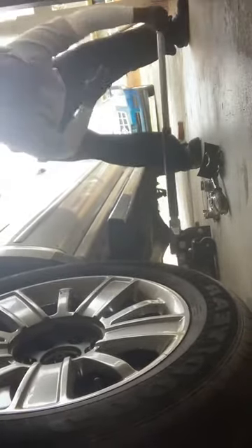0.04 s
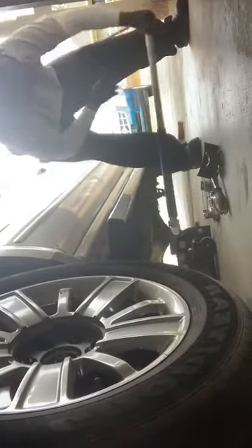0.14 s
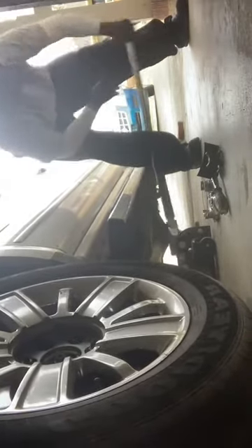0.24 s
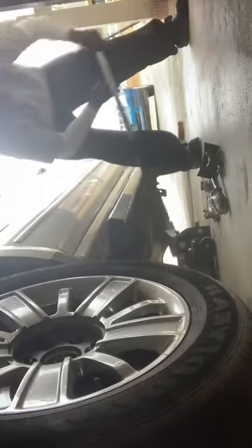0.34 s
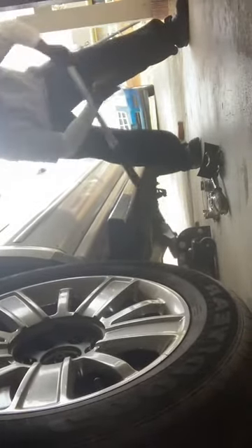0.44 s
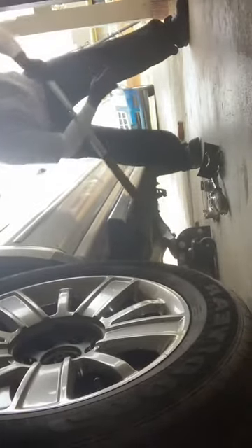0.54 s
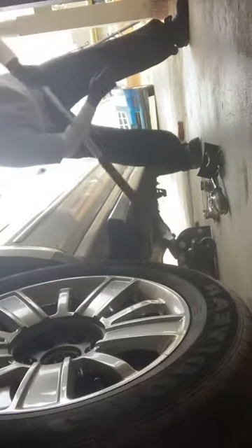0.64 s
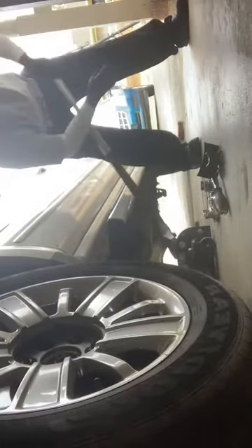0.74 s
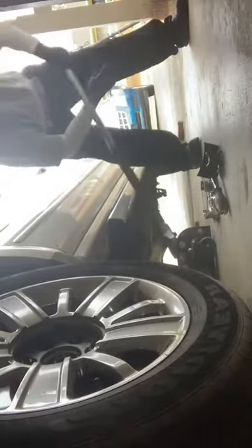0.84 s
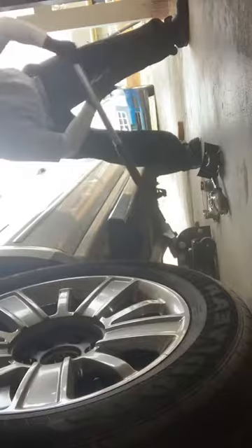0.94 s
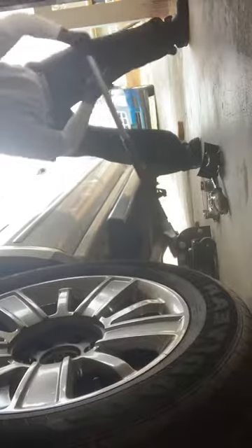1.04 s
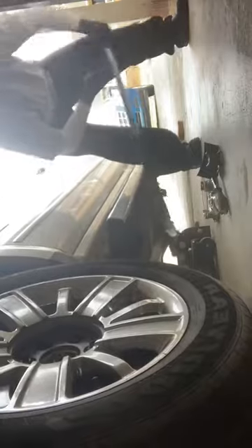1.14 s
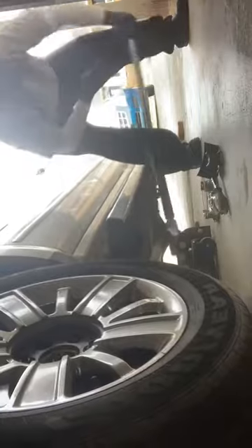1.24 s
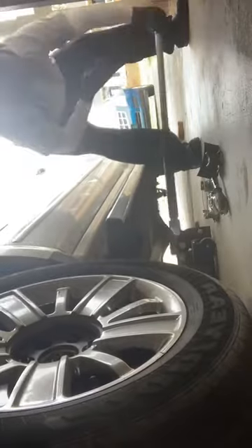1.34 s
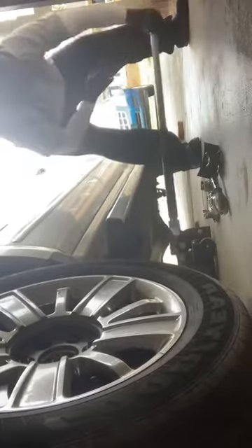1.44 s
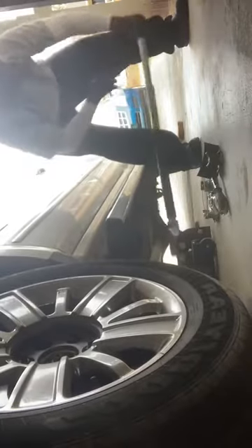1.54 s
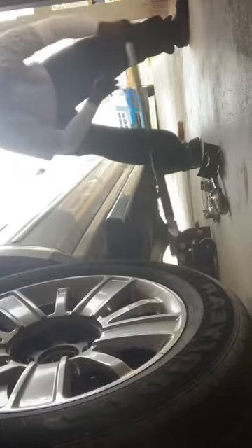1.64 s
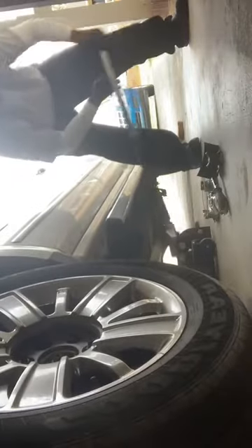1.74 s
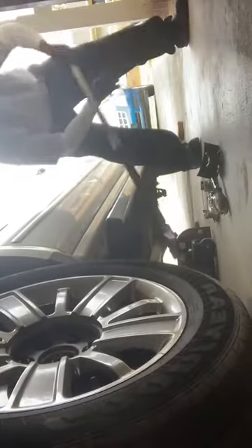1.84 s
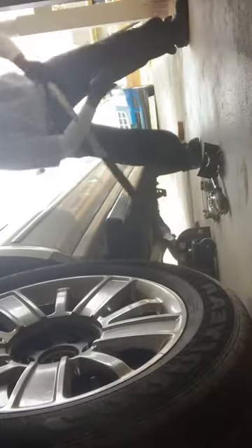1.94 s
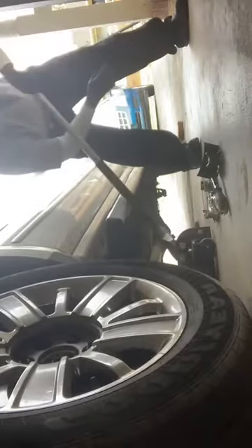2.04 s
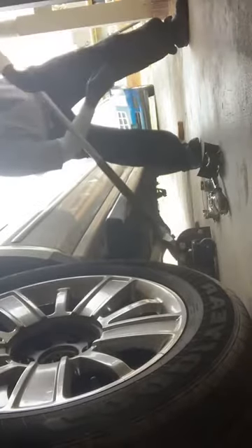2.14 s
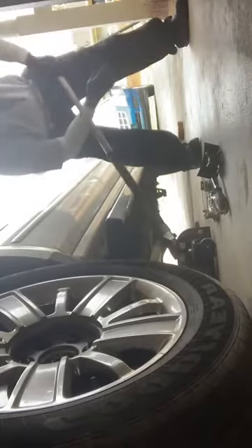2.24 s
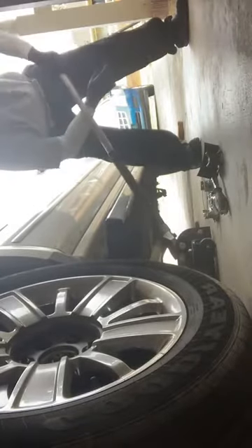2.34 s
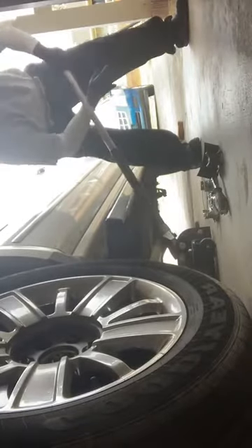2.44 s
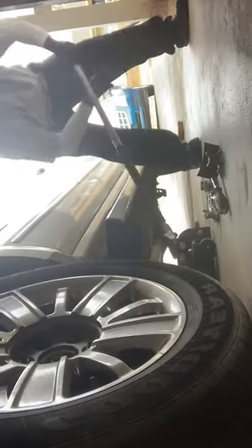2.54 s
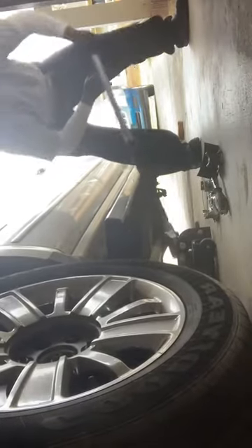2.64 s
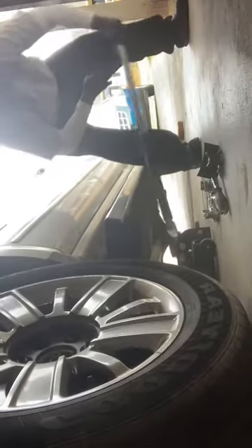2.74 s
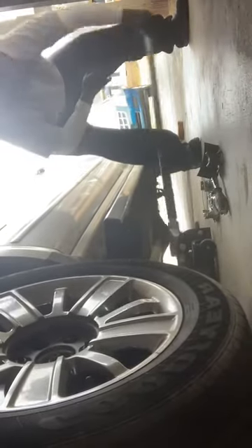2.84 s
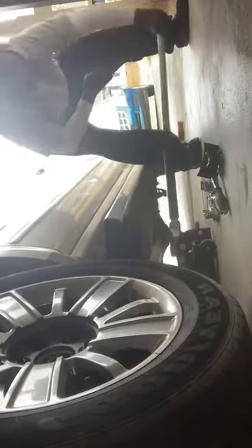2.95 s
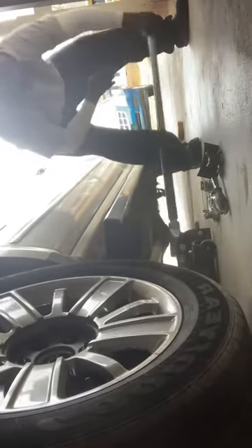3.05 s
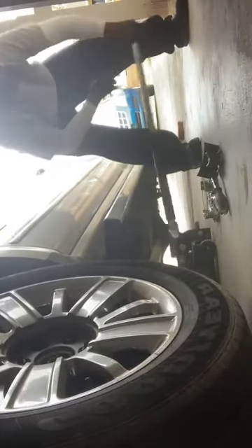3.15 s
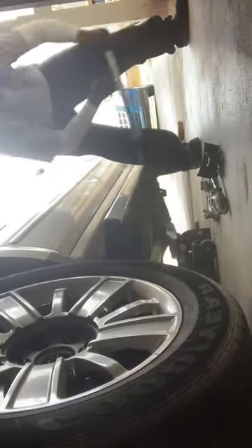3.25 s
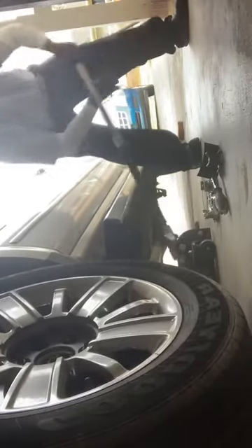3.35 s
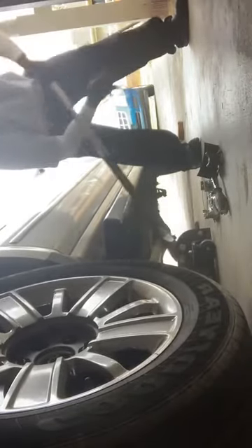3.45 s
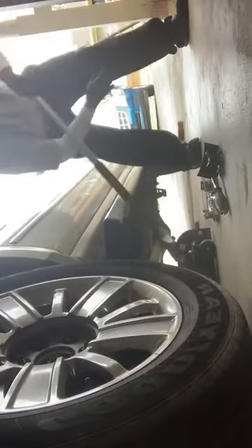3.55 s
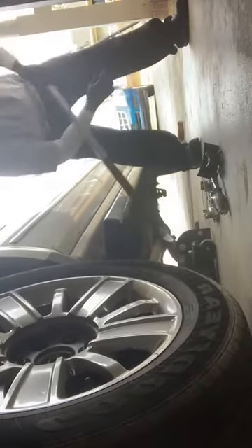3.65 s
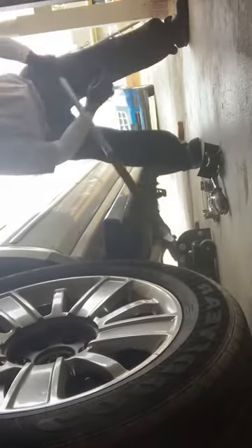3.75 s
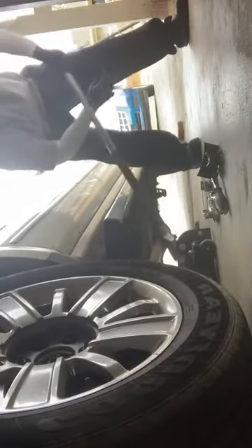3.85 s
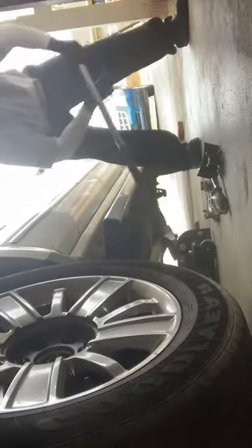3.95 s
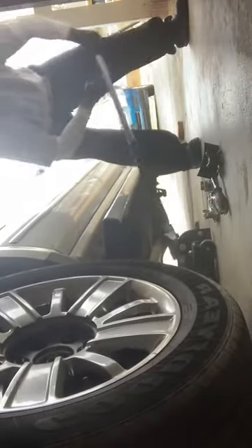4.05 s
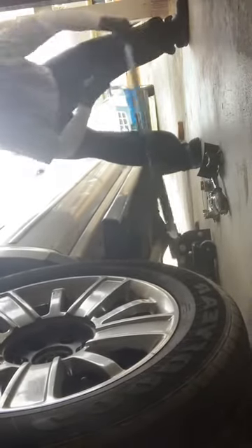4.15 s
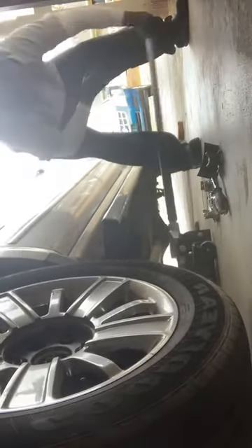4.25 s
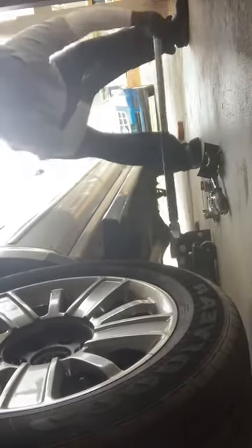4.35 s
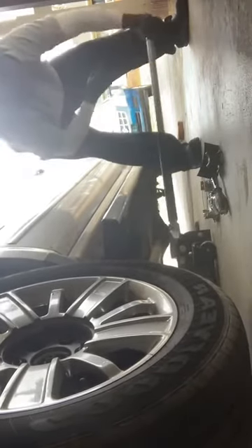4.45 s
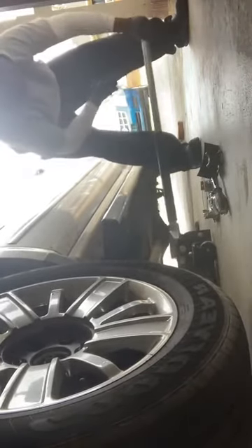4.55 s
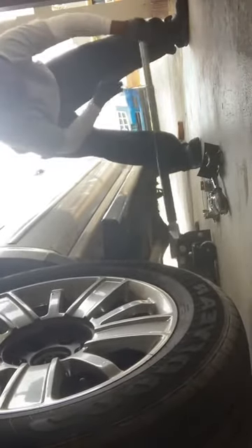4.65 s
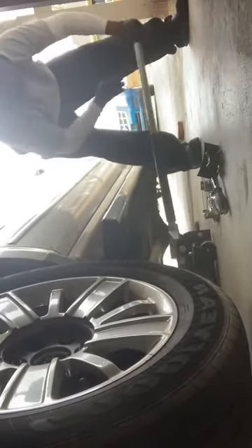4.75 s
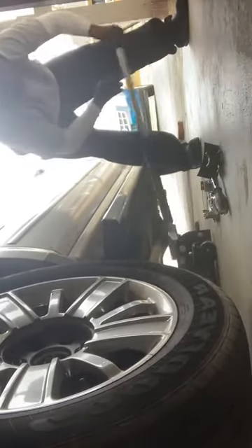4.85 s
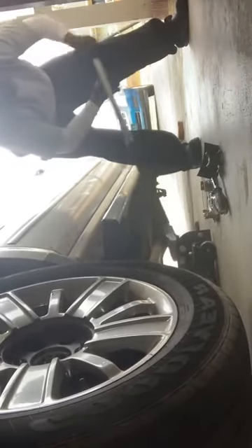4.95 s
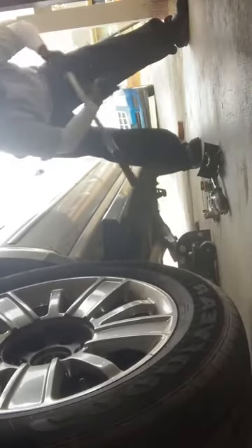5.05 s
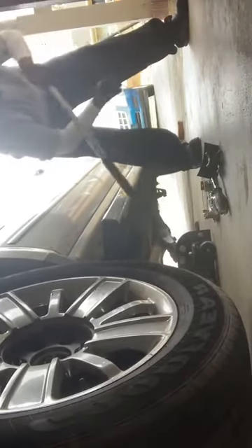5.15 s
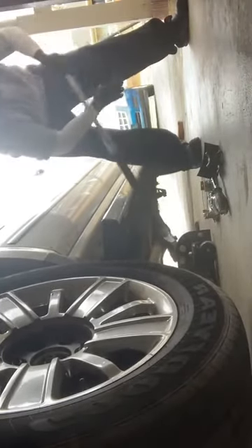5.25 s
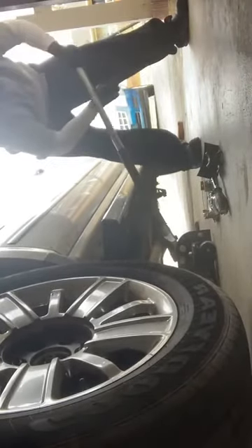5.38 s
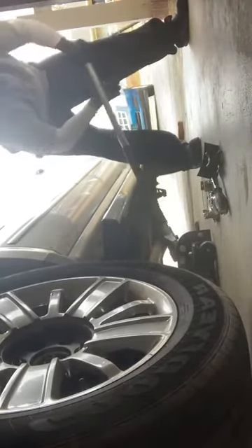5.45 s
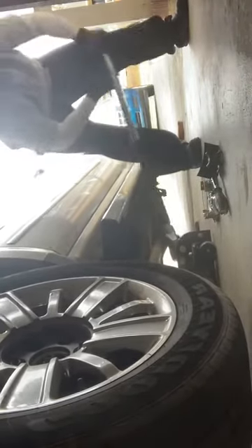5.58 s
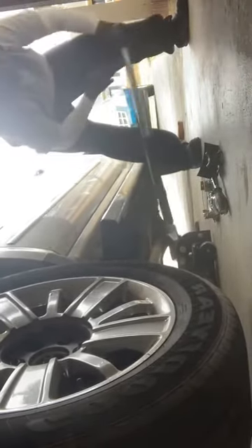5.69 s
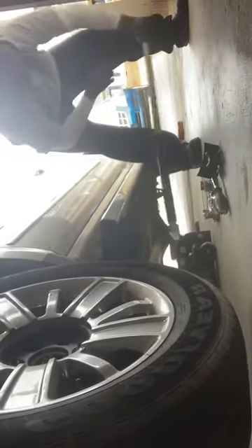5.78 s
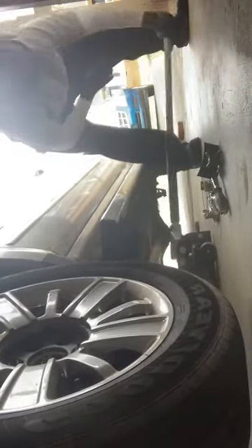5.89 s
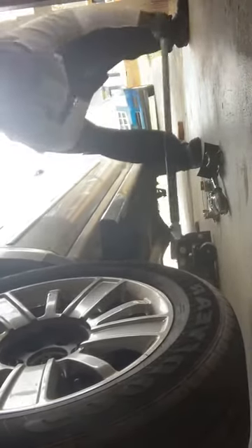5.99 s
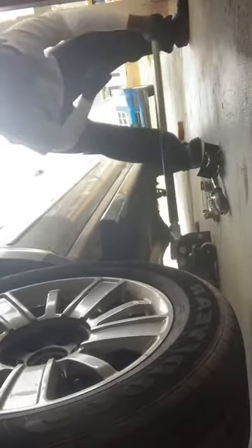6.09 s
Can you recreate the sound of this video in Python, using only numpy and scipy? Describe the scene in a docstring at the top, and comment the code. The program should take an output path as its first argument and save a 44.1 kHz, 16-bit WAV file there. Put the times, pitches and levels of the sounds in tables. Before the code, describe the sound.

A steel floor jack is pumped on concrete, four loud metallic clanks about a second and a half apart, with squeaks, rubbing and low truck booms.

```python
"""On concrete in a yard, a steel floor jack is pumped beside a truck, heard by a microphone close by.
Its handle and linkage knock and rattle: noise rings steel modes, and showers of tiny contacts make shudders.
Pivots squeak and parts creak by stick-slip, made as noise in narrow resonances; sliding parts rub and hiss.
The truck body booms after jolts, as noise in a drifting low resonance. The yard is a steady, patchy hum."""
import sys
import numpy as np
from scipy import signal
from scipy.fft import rfft, irfft
from scipy.io import wavfile
from scipy.ndimage import uniform_filter1d

SR = 44100
rng = np.random.default_rng(int(sys.argv[2]) if len(sys.argv) > 2 else 0)


def materialize(psi):
    """Save the field psi as 16-bit PCM at rate SR to the path in sys.argv[1].

    A 1-D psi becomes a single channel; in a 2-D psi each row is a channel.
    """
    bounded = np.clip(np.atleast_2d(psi).T, -1, 1)
    quanta = np.round(bounded * 32767).astype(np.int16)
    wavfile.write(sys.argv[1], SR, quanta)


N = 269874  # samples in the scene
SHORT_N = N // 8  # samples of chance drawn for one short sound

# Knocks of handle and linkage: t/s, clink level/dB, clank level/dB, frame thud level/dB, ring length (factor)
KNOCKS = [(0.0094, -42, -64, -46.5, 0.83), (0.3265, -45, -34.5, -37, 0.61), (0.7976, -48.5, -39, -35, 0.73),
          (0.8316, -43, -38.5, -34.5, 0.33), (0.9198, -34, -38, -38.5, 0.74),
          (1.038, -12.5, -20, -12.5, 0.71), (1.3745, -49, -54, -51, 0.77), (1.725, -42.5, -33.5, -39, 0.87),
          (2.1349, -39.5, -39.5, -35.5, 0.53), (2.2758, -36.5, -34, -38.5, 0.62),
          (2.4035, -41, -41.5, -46.5, 1), (2.5854, -11, -18, -10, 0.67), (3.002, -40, -62, -49, 0.66),
          (3.153, -52, -61, -48, 0.71), (3.2498, -41, -34, -35.5, 0.7), (3.6126, -26, -39, -45, 0.29),
          (3.6222, -22.5, -24.5, -35, 0.67), (3.7133, -28.5, -30.5, -64, 0.97),
          (3.7309, -24, -32, -32.5, 0.57), (3.8441, -44.5, -43, -53, 0.94), (3.8775, -59, -45, -38.5, 0.44),
          (3.9609, -10, -18.5, -13, 0.69), (4.3399, -48, -52, -44.5, 1), (4.399, -52, -42.5, -46, 0.44),
          (4.835, -58, -46, -48, 0.52), (4.879, -39, -31, -33.5, 0.68), (5.08, -52, -42.5, -39, 1),
          (5.284, -48.5, -41.5, -41, 0.68), (5.303, -33.5, -35.5, -31, 0.52),
          (5.3155, -34, -29.5, -29.5, 0.51), (5.4012, -35.5, -33.5, -37.5, 0.95),
          (5.5086, -8.5, -14.5, -12.5, 0.8), (5.938, -50.5, -40, -26, 0.72)]
# Middle of each part of a knock (clink, tick, clank, frame thud): f/Hz
PART_HZ = [3500, 7500, 1300, 450]
# Build-up of the same four parts in a hard knock, slowest in the bass: rise/s
PART_RISES_S = [.0012, .002, .003, .014]
# Clear ringing modes of the steel: f/Hz, level/dB, time to fall 60 dB/s (held within 0.05 to 0.6 s in use)
STEEL_MODES = [(201, 7, 0.098), (335, -11, 1.4), (397, -1, 0.58), (545.4, 2.5, 0.13), (948, -13.5, 2.6),
               (1233, -7.5, 0.28), (1527, -9.5, 0.16), (1788, -7.5, 0.33), (1904, -0.5, 0.097),
               (2540, -37.5, 0.29), (2673, -17, 0.46), (3310, -16.5, 0.4), (3330, -3.5, 0.1),
               (3642, -2, 0.11), (3830, -41.5, 0.95), (4502, 4, 0.028), (4560, -9, 0.19),
               (4400, -17, 0.062), (5140, -26, 0.084), (5260, -16.5, 0.57), (514.2, 1, 0.41),
               (672, -0.5, 0.085)]
# Colour of the many close modes: f/Hz, level/dB per Hz
CLOSE_MODES = [(71, -35), (120, -16), (249, -12.5), (382, -1.5), (460, -8.5), (544, -8), (821, -16),
               (936, -12), (1110, -13.5), (1240, -17.5), (3330, -18.5), (7710, -23), (10400, -43.5),
               (13500, -63.5), (22000, -120)]
# Ringing of the close modes, with the echo of walls and truck: f/Hz, time to fall 60 dB/s
CLOSE_MODES_T60 = [(150, 0.91), (420, 0.52), (1100, 0.43), (2900, 0.52), (7700, 0.43)]
# Shudders of the loaded linkage: t/s, length/s, rattle level/dB, level change by the end/dB,
# groan level/dB, groan pitch f/Hz
SHUDDERS = [(1.102, 0.26, -36.5, -36, -41.5, 2744), (2.418, 0.17, -49, -17, -54.5, 2930),
            (2.661, .28, -35.5, -39.5, -39.5, 2840), (3.751, 0.048, -38.5, -22, -66, 2740),
            (4.041, .21, -40, -18.5, -40.5, 2806), (5.407, 0.104, -46, 9, -51.5, 2660),
            (5.584, .16, -43, -23, -43.5, 2580)]
# Colour of the rattle in a shudder: f/Hz, level/dB per Hz
SHUDDER_COLOUR = [(350, -39), (600, -16.5), (730, -15), (1030, -4), (1820, -7.5), (3360, -4.5),
                  (3730, -5.5), (4480, -10), (7280, -16.5), (9500, -44), (12400, -80), (20900, -120)]
# Partials of a groan: multiple of the pitch (factor), level/dB
GROAN_PARTIALS = [(1, 2), (.53, -3.5), (.36, -6.5), (1.2, -9), (1.59, -6)]
# Dry pivot squeaks: t/s, length/s, pitch f/Hz, level/dB
SQUEAKS = [(0.434, 0.095, 4660, -38), (0.517, 0.15, 4266, -45), (0.82, 0.11, 2860, -44.5)]
# Single creaks of jack and truck: t/s, length/s, pitch f/Hz, level/dB
CREAKS = [(0.42, 0.062, 3090, -42.5), (2.844, .22, 134, -39), (3.37, 0.22, 3200, -55.5),
          (4.36, .16, 240, -54), (4.51, 0.18, 75.8, -34), (1.22, 0.27, 77, -33.5), (6.08, .08, 2900, -59),
          (4.399, 0.086, 1530, -48.5), (4.39, 0.07, 890, -51), (5.543, 0.11, 294, -30.5)]
# Loudness of the moving linkage: t/s, rub level/dB, scrape level/dB
RUB_LEVELS = [(0.0, -54.5, -55), (0.83, -59.5, -65), (1.06, -49.5, -49), (1.45, -59, -64.5),
              (2.23, -58.5, -61.5), (2.35, -82, -59.5), (2.62, -55, -48.5), (2.84, -51, -56.5),
              (3.07, -63.5, -64.5), (3.65, -54, -60.5), (3.82, -58.5, -51.5), (4.09, -46, -52.5),
              (4.46, -64.5, -64.5), (4.7, -58, -66.5), (5.32, -62, -62.5), (5.52, -60, -56),
              (5.74, -61.5, -59), (6.12, -66, -68.5)]
# Resonances of the rub: f/Hz, width f/Hz, level/dB
RUB_BANDS = [(2420, 340, 1), (2900, 280, -0.5), (3320, 380, -2)]
# Colour of the fine hiss: f/Hz, level/dB
HISS_COLOUR = [(2000, 11), (4200, 23.0), (6500, 19), (8500, 9), (9800, -4), (10600, -60.5)]
# Colour of the low scrape: f/Hz, level/dB
SCRAPE_COLOUR = [(250, 12), (600, 16), (1000, 22.5), (1700, 20), (2600, 8), (5000, -59.5)]
# Booms of the truck body after jolts: t/s, hold counted from the start/s, level/dB, centre f/Hz
BOOMS = [(-0.05, 0.36, -44, 68.3), (0.798, 0.13, -45.5, 67), (1.042, .1, -34.5, 68.5),
         (1.213, 0.19, -38.5, 80.2), (2.149, 0.2, -39.5, 74), (2.584, 0.24, -32, 66),
         (3.348, 0.038, -47.5, 63), (3.594, 0.18, -33, 65.2), (3.964, .1, -30.5, 68.7),
         (4.11, 0.22, -36.5, 82), (5.116, 0.41, -44, 67.6), (5.52, 0.21, -31, 63.3), (5.818, .3, -36, 77.6)]
# Colour of the wide shake under the booms: f/Hz, level/dB per Hz
SHAKE_COLOUR = [(12, -43.5), (20, -36), (49, 11), (65, 2.5), (81, 3), (140, 8.5), (167, -17.5), (200, 5.5),
                (260, -5), (440, -120)]
# Colour of the yard hum: f/Hz, level/dB per Hz
YARD_COLOUR = [(12, -5), (20, 4.5), (54, 10), (96, 12), (281, -8.5), (385, -3), (450, -8.5), (740, -18),
               (1190, -38), (1760, -38), (2400, -76.5), (2960, -25), (7020, -40.5), (9370, -78.5),
               (10400, -109), (13500, -106), (22000, -120)]

TICK_DB = -12.5  # the high tick, against the clink
SLIP_RISE_S, SLIP_FADE_DB = 0.024, -13.5  # every slip catches quickly; squeaks and creaks then fade
OCTAVE_DB = -21.5  # octave of a dry squeak, against the squeak
WANDER, FLICKER_DB = .012, 2.5  # pitch drift of the rub (share); level flicker of squeaks, creaks, groans, rub
HISS_DB, HISS_FOLLOWS, RUB_USUAL_DB = -62, 0.9, -56.5  # the hiss makes 0.9 of the rub's level swings
BOOM_RISE_S, BOOM_FALL_DB_PER_S = 0.029, 89
REST_DB, REST_HZ = -57, 93  # the truck between booms
YARD_DB = -48.5
EDGE_HZ = 10400  # upper limit of the sound


def jack():
    """All knocks and shudders: steel parts hit each other, or slip and catch under load."""
    out = np.zeros(N)
    for s, clink_db, clank_db, thud_db, ring in KNOCKS:
        parts_db = [clink_db, clink_db + TICK_DB, clank_db, thud_db]
        add(out, s - .001, knock(parts_db, ring))
    for s, length, rattle_db, fade_db, groan_db, hz in SHUDDERS:
        add(out, s, shudder(length, rattle_db, fade_db))
        for multiple, db in GROAN_PARTIALS:
            add(out, s, squeak(.04, length, multiple * hz, groan_db + db, fade_db))
    return out


def knock(parts_db, ring):
    """A crack and a short rattle of contacts ring clear steel modes and a dense wash of close ones."""
    t = np.arange(30000) / SR
    body = signal.oaconvolve(close_modes(t, ring) + gain_of(-2.0) * clear_modes(t, ring), contacts())
    spectrum = rfft(body[:len(t)])
    pitch = np.log(np.fft.rfftfreq(len(t), 1 / SR) + 1)
    order = np.argsort(PART_HZ)
    weak = np.clip((-26 - max(parts_db)) / 15, 0, 1)  # light knocks start softer, with less crack
    out = np.zeros(len(t))
    for k, (db, rise_s, crack) in enumerate(zip(parts_db, PART_RISES_S, (1.3, 0.75, 0.54, 0.083))):
        share = np.interp(pitch, np.log(PART_HZ)[order], order == k)  # overlapping shares that sum to 1
        rise = 1 - np.exp(-t / (rise_s * (1 + 0.5 * weak)))
        burst = 1 + (1 - 0.72 * weak) * crack * np.exp(-t / 0.0085)
        part = irfft(spectrum * share, len(t)) * rise * burst
        loudest = np.sqrt(uniform_filter1d(part ** 2, 400).max())
        out += gain_of(db) * part / (2.16 * loudest)
    return out * np.clip(20 * (t[-1] - t), 0, 1)  # the last 50 ms fade to silence


def close_modes(t, ring):
    """Many modes too close to tell apart: patchy noise that dies away at a speed set by frequency."""
    noise = coloured(rng.standard_normal(len(t)), CLOSE_MODES)
    hz, frames, z = signal.stft(noise, SR, nperseg=256)
    fall_db = -60 * frames / (ring * read(CLOSE_MODES_T60, hz)[:, None])
    z = z * gain_of(fall_db + 1.99 * patches(z.shape, 3, 12))
    return evened(signal.istft(z, SR, nperseg=256)[1][:len(t)])


def clear_modes(t, ring):
    """Separate steel modes: each is a sine wave that dies away at its own speed."""
    f, db, t60 = np.transpose(STEEL_MODES)[:, :, None]
    favour_db = 0.93 * rng.standard_normal(f.shape)  # each blow lands elsewhere and favours other modes
    fall_db = -60 * t / (ring * np.clip(t60, .05, .6))
    modes = gain_of(db + favour_db + fall_db) * np.sin(2 * np.pi * f * t)
    return evened(modes.sum(0))


def contacts():
    """The first hit and up to five weaker touches in the next few hundredths of a second."""
    hits = np.zeros(2048)
    at = np.clip(.01 * SR * abs(rng.standard_normal(5)), 0, 2047).astype(int)
    hits[at] = 0.3 * np.sign(rng.standard_normal(5))
    hits[0] = 1
    return hits


def shudder(length, db, fade_db):
    """Many tiny uneven contacts in quick succession, fading or swelling."""
    t = np.arange(0, length, 1 / SR)
    grains = rng.standard_normal(SHORT_N) * gain_of(2.8 * drift(size=90, count=SHORT_N))
    shape = gain_of(db + fade_db * (t / length) ** 2) * signal.windows.tukey(len(t), .3)
    return shape * evened(coloured(grains, SHUDDER_COLOUR))[:len(t)]


def squeaks_and_creaks():
    """Surfaces stick and slip: dry pivots whistle with an octave, other parts give rougher creaks."""
    out = np.zeros(N)
    for s, length, hz, db in SQUEAKS:
        add(out, s, squeak(.008, length, hz, db, octave_db=OCTAVE_DB))
    for s, length, hz, db in CREAKS:
        add(out, s, squeak(.04, length, hz, db))
    return out


def squeak(blur, length, hz, db, fade_db=SLIP_FADE_DB, octave_db=None):
    """Stick-slip: noise in a narrow resonance makes a rough whistle, with a wider octave when dry."""
    t = np.arange(0, length, 1 / SR)
    width = 6 + blur * hz  # Hz
    wander, flicker = (drift(size=700, count=SHORT_N)[:len(t)] for _ in range(2))
    hz = hz * (1 + .3 * blur * wander)
    db = db + FLICKER_DB * flicker
    tone = resonate(resonate(rng.standard_normal(len(t)), hz, width), hz, 2 * width)
    sound = tone / np.sqrt(uniform_filter1d(tone ** 2, 1500) + 1e-12)  # flutters fast, holds its level
    if octave_db is not None:
        octave = resonate(resonate(rng.standard_normal(len(t)), 2 * hz, 550), 2 * hz, 700)
        sound = sound + gain_of(octave_db) * evened(octave)
    shape = np.minimum(t / SLIP_RISE_S, 1) * gain_of(db + fade_db * (t / length) ** 2)
    return shape * sound * signal.windows.tukey(len(t), .15)


def rubbing():
    """Greasy sliding in the linkage: noise in a few steep resonances, a fine hiss and a low scrape."""
    s, rub_db, scrape_db = np.transpose(RUB_LEVELS)
    hiss_db = HISS_DB + HISS_FOLLOWS * (rub_db - RUB_USUAL_DB)
    sliding = rng.standard_normal(N)
    rub = np.zeros(N)
    for hz, width, db in RUB_BANDS:
        centre = hz * (1 + WANDER * drift(size=5000))
        band = resonate(resonate(sliding, centre, width), centre, width)
        rub += gain_of(db + FLICKER_DB * drift(size=2500)) * evened(band)
    hiss = coloured(rng.standard_normal(N), HISS_COLOUR)
    scrape = coloured(rng.standard_normal(N), SCRAPE_COLOUR)
    t = np.arange(N) / SR
    out = np.zeros(N)
    for db, sound in ((rub_db, rub), (hiss_db, hiss), (scrape_db, scrape)):
        out += gain_of(np.interp(t, s, db)) * evened(sound)
    return out


def truck():
    """Low noise in a panel resonance swells after each jolt; the strongest jolt weighs most on its pitch."""
    s, hold, db, hz = np.transpose(BOOMS)[:, :, None]
    since = np.arange(N) / SR - s
    rise = np.clip(since / BOOM_RISE_S, 0, 1)
    fall_db = -BOOM_FALL_DB_PER_S * np.maximum(since - hold, 0)
    power = (rise * gain_of(db + fall_db)) ** 2
    rest = gain_of(REST_DB) ** 2
    total = power.sum(0) + rest
    centre = ((power * hz).sum(0) + rest * REST_HZ) / total
    shake = coloured(rng.standard_normal(N), SHAKE_COLOUR)
    panel = resonate(resonate(rng.standard_normal(N), centre, 15.3), centre, 20.5)
    panel = panel / np.sqrt(uniform_filter1d(panel ** 2, 2000) + 1e-9)  # the jolts, not chance, set its level
    return np.sqrt(total) * evened(panel + gain_of(-4.5) * evened(shake))


def yard():
    """Steady outdoor hum: coloured noise with slowly changing louder and softer patches."""
    hz, _, z = signal.stft(rng.standard_normal(N), SR, nperseg=1024)
    z = z * gain_of(read(YARD_COLOUR, hz)[:, None] + 2.6 * patches(z.shape, 10, 8))
    return gain_of(YARD_DB) * evened(signal.istft(z, SR, nperseg=1024)[1][:N])


def gain_of(db):
    """Turns decibels into a factor."""
    return 10 ** (np.asarray(db) / 20)


def evened(x):
    """Scales a sound to an average (rms) level of 1."""
    return x / np.sqrt(np.mean(x ** 2) + 1e-20)


def read(points, hz):
    """Reads a table between its points, on a log-frequency axis."""
    f, value = np.transpose(points)
    return np.interp(np.log(hz + 1), np.log(f + 1), value)


def add(mix, s, sound):
    """Mixes a sound in at s seconds."""
    part = mix[max(round(s * SR), 0):][:len(sound)]
    part += sound[:len(part)]


def coloured(x, spectrum):
    """Filters a sound by a table of frequency and level."""
    return irfft(rfft(x) * gain_of(read(spectrum, np.fft.rfftfreq(len(x), 1 / SR))), len(x))


def resonate(x, hz, width):
    """A resonance of gain 1 that can glide: shifts hz down to zero, smooths, and shifts back."""
    turn = np.exp(2j * np.pi * np.cumsum(hz * np.ones(len(x))) / SR)
    r = np.exp(-np.pi * width / SR)
    smooth = signal.lfilter([1 - r], [1, -r], x / turn + 1e-18)
    return 2 * (turn * smooth).real


def drift(size, count=N):
    """Slow random change with an rms of 1, smoothed twice over size samples."""
    return evened(uniform_filter1d(uniform_filter1d(rng.standard_normal(count), size), size))


def patches(shape, bins, frames):
    """Random change over frequency and time with an rms of 1, smoothed over some bins and frames."""
    chance = uniform_filter1d(rng.standard_normal(shape), bins, 0)
    return evened(uniform_filter1d(chance, frames, 1))


def scene():
    """Jack, squeaks and creaks, rubbing, truck and yard at one microphone."""
    return (jack() + squeaks_and_creaks() + rubbing() + truck() + yard())[None]


def record(dry):
    """Cuts the treble steeply above the upper limit."""
    low_pass = signal.firwin(255, EDGE_HZ, window=("kaiser", 9), fs=SR)
    return signal.oaconvolve(dry, low_pass[None], "same")


dry = scene()
out = record(dry)
materialize(out)
```